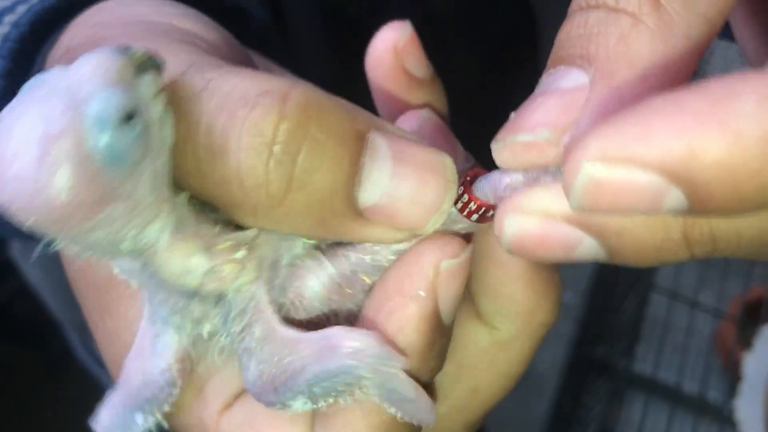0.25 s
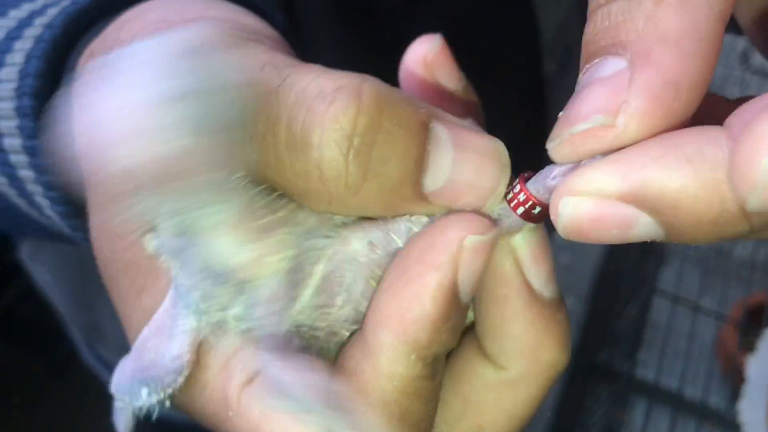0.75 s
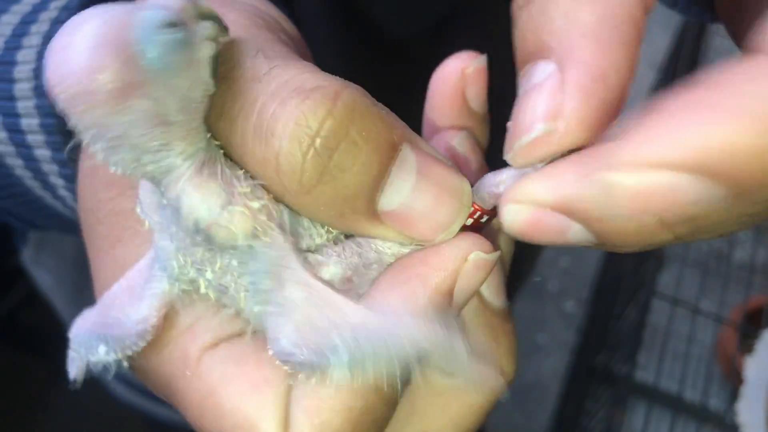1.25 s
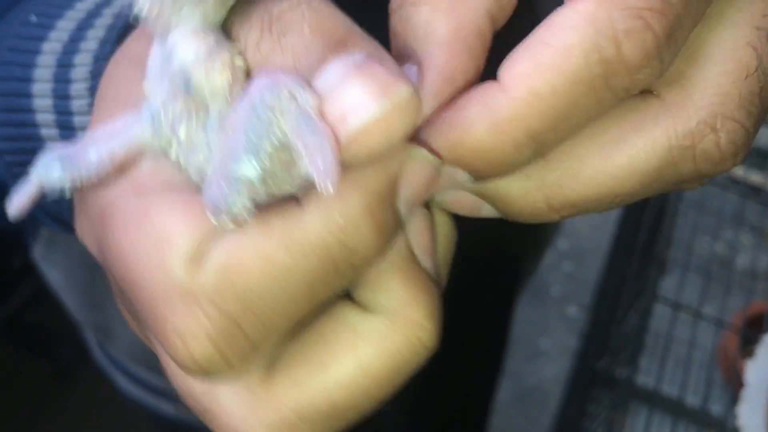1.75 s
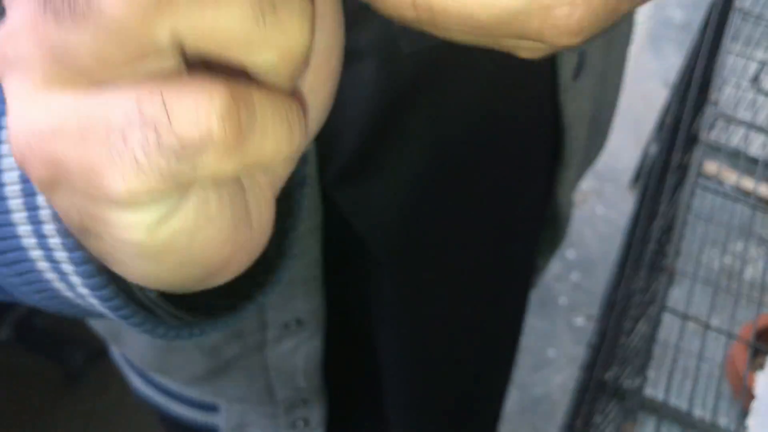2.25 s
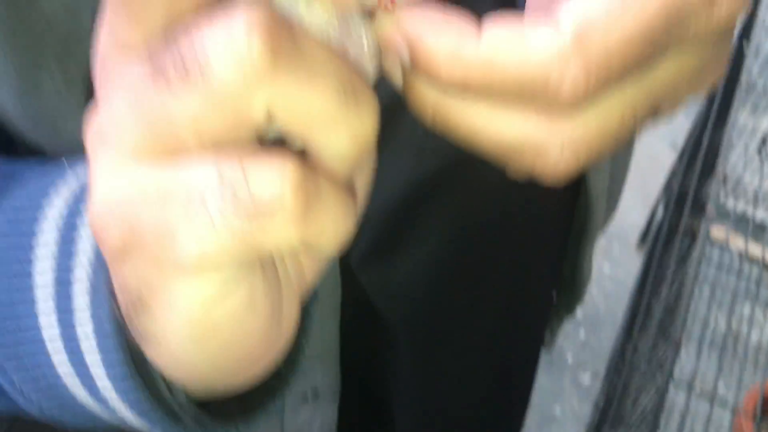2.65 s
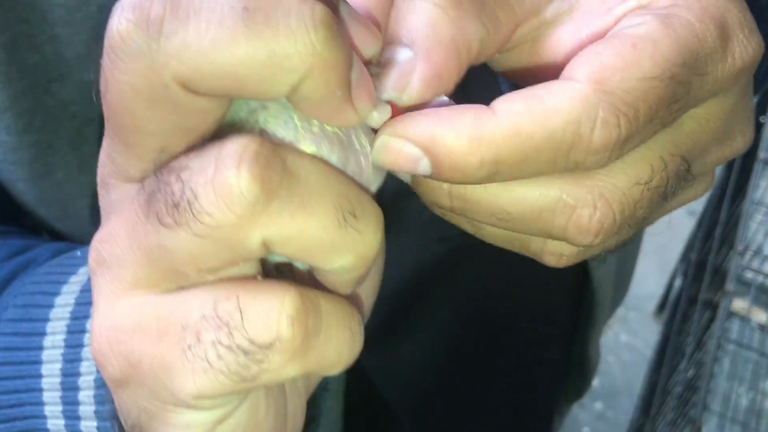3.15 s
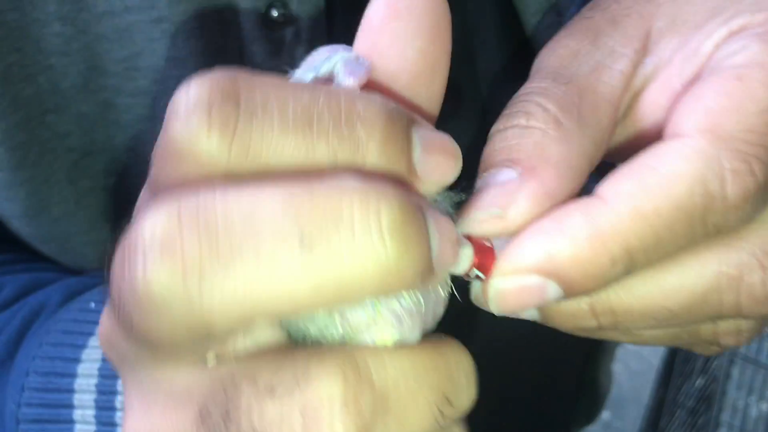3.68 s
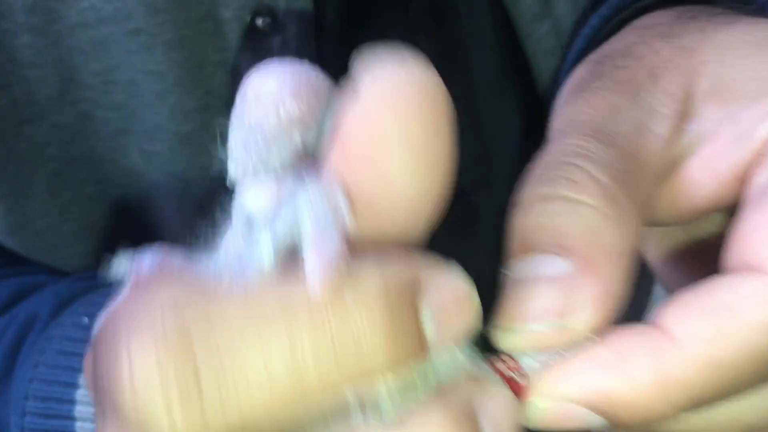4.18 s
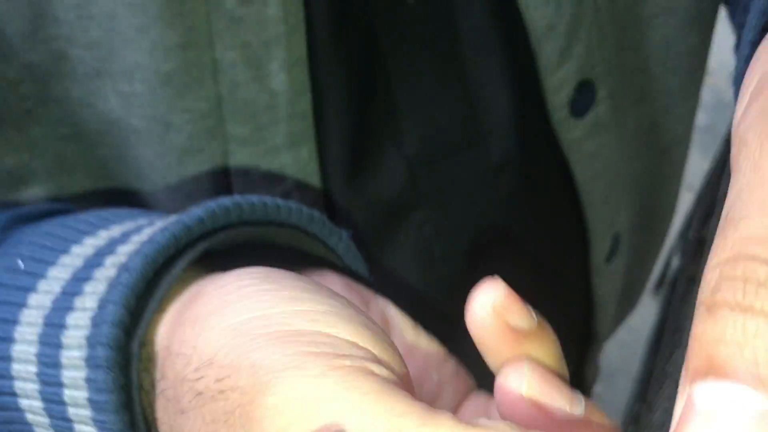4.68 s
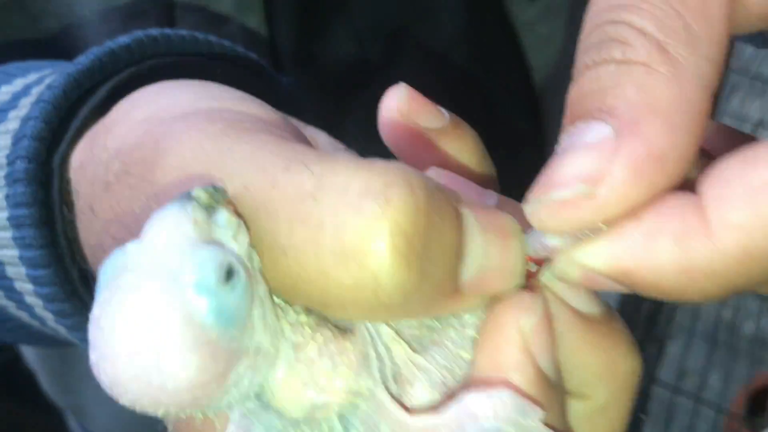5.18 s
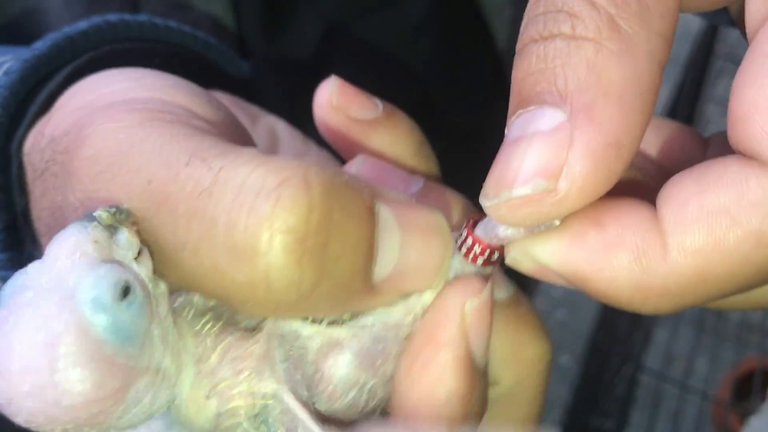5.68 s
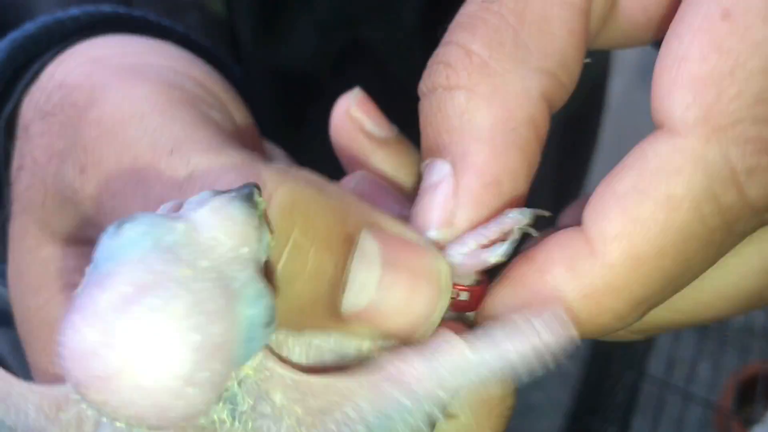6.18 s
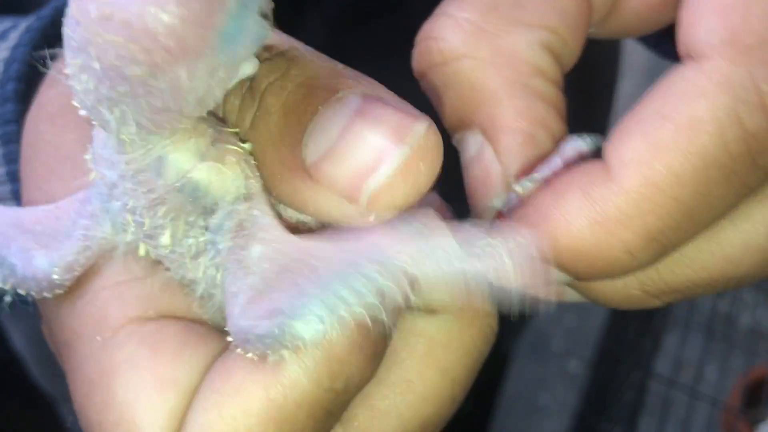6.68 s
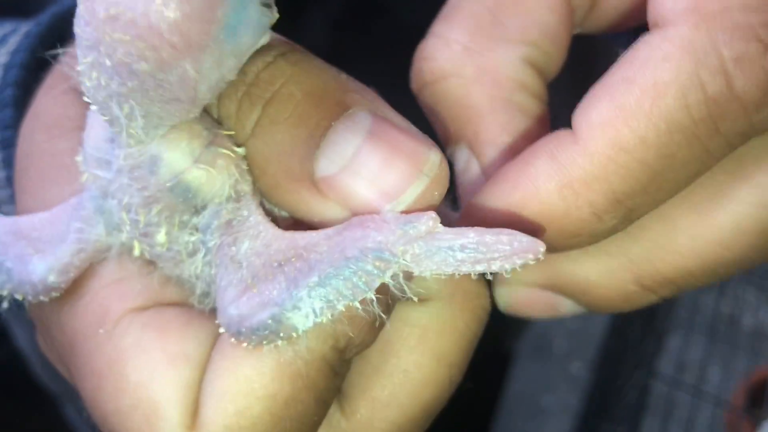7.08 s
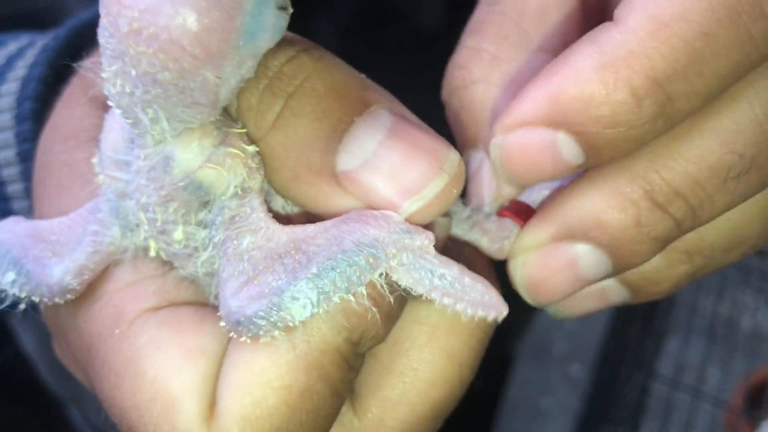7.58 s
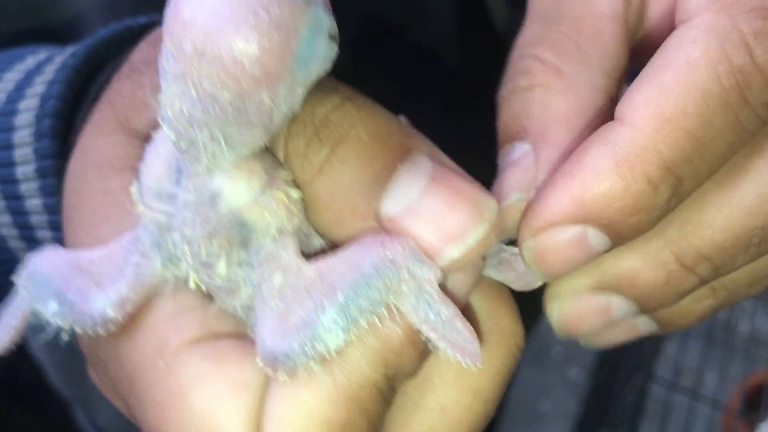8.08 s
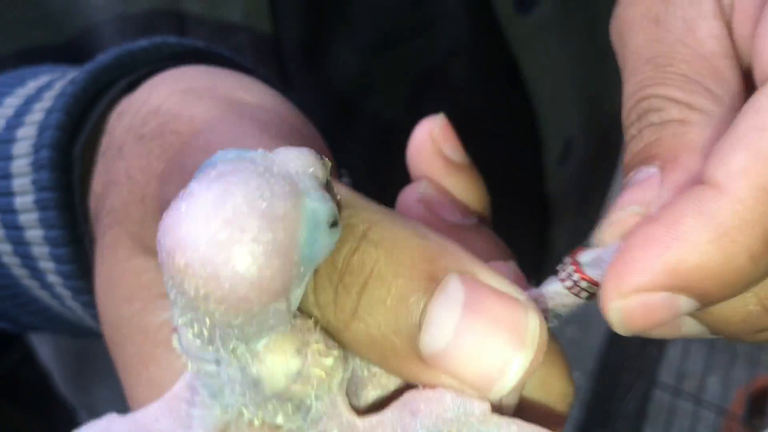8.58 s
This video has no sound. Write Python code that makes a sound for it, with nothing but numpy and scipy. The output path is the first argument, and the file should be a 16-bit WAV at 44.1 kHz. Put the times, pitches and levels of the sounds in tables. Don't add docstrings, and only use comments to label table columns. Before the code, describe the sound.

In an echoing aviary, a parrot chick rasps softly and screams once while adult parrots shriek falling two-note calls over flock peeps and ticks.

```python
import sys
import numpy as np
from scipy import signal
from scipy.fft import rfft, irfft
from scipy.io import wavfile
from scipy.ndimage import uniform_filter1d, map_coordinates

SR = 44100
rng = np.random.default_rng(int(sys.argv[2]) if len(sys.argv) > 2 else 0)


def boost_factor(decibels):
    exponent = np.asarray(decibels, float) / 20
    return 10 ** exponent


def waveform_to_disk(signal):
    frames = np.transpose(np.atleast_2d(signal))
    scaled = np.clip(frames, -1, 1) * 32767
    samples = np.round(scaled).astype(np.int16)
    wavfile.write(sys.argv[1], SR, samples)


N = 389844
PATHS = 8
PURE_TILT_DB = -22.5

# f/Hz, level/dB
ADULT_THROAT = [(1200, -16), (2100, -10.5), (2800, -17.5), (3600, 2.5), (4500, 2.5), (5500, -5),
                (7000, -11), (9000, -2.5), (11000, -10.5), (15000, -20)]
# f/Hz, level/dB
FLOCK_THROAT = [(900, 1), (2200, 0), (4300, 8.5), (5800, -1), (7500, -6), (10000, -14), (14000, -46)]


def unit(x):
    return x / np.sqrt(np.mean(x ** 2) + 1e-20)


def along(points, hz):
    f, v = np.transpose(points)
    return np.interp(np.log(hz + 1), np.log(f + 1), v)


def curve(rows):
    s, value = np.transpose(rows)
    return np.interp(np.arange(N) / SR, s, value)


def wobble(rate, n=N):
    knots = rng.standard_normal(int(N * rate / SR) + 4 if n == N else 400)
    return map_coordinates(knots, [np.arange(n) * rate / SR], mode="wrap")


def coloured(x, spectrum):
    gain = boost_factor(along(spectrum, np.fft.rfftfreq(len(x), 1 / SR)))
    return unit(irfft(rfft(x) * gain, len(x)))


def add(bus, s, x):
    part = bus[round(s * SR):][:len(x)]
    part += x[:len(part)]


def sagging(rows, sag, tilt_db):
    return [(s, length, hz, hz * sag, db, tilt_db) for s, length, hz, db in rows]


def sliding(rows, tilt_db):
    return [(*row, tilt_db) for row in rows]


def hall(feeds):
    # f/Hz, t60/s
    decay = [(500, 0.17), (1500, 1.26), (3500, 1.16), (7000, 0.75), (14000, 0.34)]
    hz, t, z = signal.stft(rng.standard_normal((PATHS, 3 * SR // 2)), SR, nperseg=256)
    t60 = np.clip(along(decay, hz), .1, 3)[:, None]
    tails = signal.istft(z * boost_factor(-60 * t / t60), SR, nperseg=256)[1]
    t = np.arange(tails.shape[1]) / SR
    tails *= np.clip(t / 0.01 - .3, 0, 1)
    tails *= 1 + 1.9 * np.exp(-t / 0.0074)
    return signal.fftconvolve(feeds, tails / np.linalg.norm(tails[0]), axes=1)[:, :N].sum(0)


def sing(notes, throat, bend, attack, jitter, buzz, rasp_db, breath_db, wet_db, dry_db, first=0):
    # f/Hz, level/dB
    beak_air = [(500, -69), (1200, -25.5), (2200, 4.5), (3500, 6.5), (5200, -5.5), (8500, -4.5),
                (11000, -16.5), (15500, -26)]
    buzz_hz = 334.3
    catch_hz, catch_share = 170, 1.1
    direct, feeds = np.zeros(N), np.zeros((PATHS, N))
    k = np.arange(1, 15)[:, None]
    for i, (s, length, hz_from, hz_to, db, tilt_db) in enumerate(notes):
        u = np.linspace(0, 1, max(round(length * SR), 64))
        n = len(u)
        shake = jitter * wobble(396, n) + buzz * u * np.sin(2 * np.pi * buzz_hz * length * u)
        pitch = (hz_from + (hz_to - hz_from) * u ** bend) * (1 + shake)
        hz = k * pitch
        levels = boost_factor(along(throat, hz) + tilt_db * np.log2(k)) * (hz < SR / 2.2)
        partials = levels * np.sin(2 * np.pi * k * np.cumsum(pitch) / SR + k * k)
        partials /= np.std(partials.sum(0))
        aside = boost_factor(-3.5 * np.log2(np.maximum(hz / 4500, 1)))
        swell = np.clip(np.minimum((u / attack) ** 1.5, (1 - u) / .15), 0, 1)
        air = coloured(rng.standard_normal(SR // 4), beak_air)[:n]
        breath = swell * boost_factor(breath_db) * air
        catches = catch_share * np.clip(wobble(catch_hz, n), 0, 2)
        unsteady = boost_factor(min(rasp_db, 4) * (wobble(700, n) - catches))
        near = unsteady * (aside * partials).sum(0) + breath
        around = unsteady * partials.sum(0) + breath
        add(direct, s, boost_factor(db + dry_db) * swell * near)
        add(feeds[(i + first) % PATHS], s, boost_factor(db + wet_db) * swell * around)
    return direct, feeds


def chatter():
    # f/Hz, level/dB
    far_throat = [(700, -0.5), (1000, -4), (1600, 0), (2500, 0), (3500, -20), (5000, -9.5), (9000, -22)]
    notes = []
    for when, size, height, loud in rng.random((240, 4)):
        hz = 1000 + 1300 * height
        notes.append((when * N / SR, .03 + .05 * size, hz, hz * (.65 + .2 * size), 4 * loud, -2))
    near, feeds = sing(notes, far_throat, bend=1, attack=.3, jitter=.03, buzz=.05, rasp_db=4,
                       breath_db=-8, wet_db=0, dry_db=-8)
    babble = near + hall(feeds)
    return babble / np.sqrt(np.abs(uniform_filter1d(babble ** 2, size=SR // 5)) + 1e-9)


def background():
    # t/s, level/dB
    chatter_course = [(0, -51), (.45, -48), (.9, -44), (1.3, -49.5), (1.7, -41), (2.1, -44.5), (2.45, -37),
                      (3, -52), (3.3, -38.5), (4.8, -38.5), (5.3, -42.5), (5.85, -36.5), (6.5, -45.5),
                      (7.05, -52.5), (7.55, -47.5), (8, -51), (8.4, -40), (8.84, -53)]
    hum_course = [(0, -51.5), (1.5, -49.5), (3, -52), (4.5, -52.5), (6, -51.5), (7.5, -49), (8.84, -51.5)]
    air_course = [(0, -61), (1.4, -62), (2.2, -63), (3, -60.5), (6.5, -65), (7.3, -59), (8.84, -69)]
    # f/Hz, level/dB per Hz
    air_colour = [(2350, -34), (4000, 13.5), (4770, 9), (5430, -12), (5910, 3), (13500, 6.5), (15500, -9)]
    rumble_colour = [(15, -38), (25, -29), (46, 10), (75, 4), (141, 6), (212, 7.5), (517, -2), (608, 0.5),
                     (800, 0.5), (926, 3), (1200, 2.5), (1560, -7), (2640, -120)]
    # f/Hz, level/dB
    fan = [(52, -86), (64, -57), (100, -63), (192, -71)]
    t = np.arange(N) / SR
    lines = np.zeros(N)
    for hz, db in fan:
        lines += boost_factor(db + 3.9 * wobble(12.0)) * np.sin(2 * np.pi * (hz * t + 0.43 * wobble(7.4)))
    air_db = curve(air_course) + 4.4 * wobble(4.4) + wobble(25)
    air = boost_factor(air_db) * coloured(rng.standard_normal(N), air_colour)
    hum_db = curve(hum_course) + 1.37 * wobble(6.7)
    hum = boost_factor(hum_db) * coloured(rng.standard_normal(N), rumble_colour)
    return boost_factor(curve(chatter_course) - 1.83) * chatter() + air + hum + lines


def earlier_calls():
    # f/Hz, level/dB
    past_calls = [(3990, -35), (3500, -40), (2900, -48), (1800, -41.5)]
    length_s, sag, ago_s = .012, .75, .06
    notes = sagging([(0, length_s, hz, db) for hz, db in past_calls], sag, PURE_TILT_DB)
    feeds = sing(notes, ADULT_THROAT, bend=1, attack=.1, jitter=.06, buzz=0, rasp_db=4,
                 breath_db=4, wet_db=3, dry_db=0)[1]
    return hall(feeds[:, :SR // 10])[round(ago_s * SR):]


def flock():
    # t/s, length/s, f/Hz, level/dB
    shrills = [(1.67, 0.039, 2130, -52), (1.95, 0.03, 3160, -42), (2.08, 0.053, 2940, -43),
               (2.137, 0.025, 2740, -47), (2.32, 0.028, 2800, -47), (2.52, 0.062, 1990, -45.5),
               (7.645, 0.028, 3200, -58)]
    peeps = [(.92, 0.08, 1583, -53), (.93, 0.11, 3170, -52), (.92, 0.081, 4740, -57),
             (1.03, .04, 2900, -50), (1.05, .02, 1607, -45), (1.1, 0.028, 1582, -48),
             (1.35, 0.05, 2970, -56), (1.14, 0.01, 900, -44.5), (1.45, 0.031, 2260, -47),
             (1.925, 0.01, 3600, -40), (2.11, 0.027, 2440, -45.5), (2.32, 0.034, 2765, -39),
             (2.37, 0.035, 2410, -41.5), (6.18, 0.1, 1089, -44.5), (6.628, 0.063, 1123, -39.5),
             (6.63, 0.04, 1448, -37), (6.7, .12, 1476, -46), (6.632, 0.014, 2164, -32),
             (7.575, 0.023, 1540, -48), (7.68, 0.061, 3650, -50.5), (7.88, 0.045, 1470, -51),
             (8.575, 0.061, 3420, -42)]
    squawks = [(1.29, 0.04, 1640, -58), (1.32, 0.041, 1450, -51.5), (2.4, 0.033, 1270, -46),
               (7.1, 0.12, 3580, -56.5), (7.94, 0.053, 1067, -45.5), (8.065, 0.069, 1097, -44),
               (8.198, 0.067, 1110, -43.5), (8.3, 0.13, 1114, -52)]
    # t/s, length/s, first f/Hz, last f/Hz, level/dB
    swoops = [(.655, 0.03, 2365, 2760, -39), (1.765, 0.017, 3310, 2130, -46),
              (1.782, 0.097, 2150, 1780, -46.5), (1.97, .1, 2600, 2500, -52),
              (1.945, 0.025, 3030, 2550, -41), (2.07, .055, 2850, 3000, -52),
              (2.125, 0.04, 3000, 3430, -48), (2.348, 0.031, 3375, 2530, -36.5),
              (2.54, 0.0213, 3830, 3000, -43.5), (2.6, 0.031, 2550, 3500, -45),
              (7.305, 0.037, 1865, 1594, -43.5), (8.27, 0.058, 946, 1486, -48.5)]
    sag, squawk_tilt_db, shrill_tilt_db = .975, -2, 9
    cries = sagging(shrills, sag, shrill_tilt_db) + sagging(peeps, sag, PURE_TILT_DB)
    cries = sorted(cries + sliding(swoops, PURE_TILT_DB))
    return [sing(cries, FLOCK_THROAT, bend=.8, attack=.12, jitter=.01, buzz=.012, rasp_db=3,
                 breath_db=-18, wet_db=-4, dry_db=0),
            sing(sagging(squawks, sag, squawk_tilt_db), FLOCK_THROAT, bend=.8, attack=.25, jitter=.015,
                 buzz=.015, rasp_db=4, breath_db=-9, wet_db=-2, dry_db=-1)]


def crier():
    # t/s, length/s, first f/Hz, last f/Hz, level/dB, tilt/dB per octave
    cries = [
        (.365, 0.083, 1715, 1553, -47, -9.5),
        (.582, 0.087, 1551, 1404, -46.5, -6.5),
        (8.632, 0.13, 1884, 1254, -37.5, -7),
    ]
    # f/Hz, level/dB
    cry_throat = [(900, -8), (1700, -4), (2400, -7), (3400, 7), (4600, 4), (5800, 1), (7500, -19),
                  (14000, -50)]
    return [sing(cries, cry_throat, bend=1, attack=.12, jitter=.008, buzz=.04, rasp_db=4,
                 breath_db=-11, wet_db=1, dry_db=0, first=4)]


def answering_adult():
    # t/s, length/s, f/Hz, level/dB
    answers = [(3.45, 0.21, 3156, -31.5), (3.7, 0.095, 3113, -29), (4.0, 0.057, 3130, -29.5),
               (4.21, .11, 3183, -32), (4.53, 0.11, 3145, -35.5), (4.76, 0.082, 3253, -31),
               (5.04, 0.162, 3214, -32), (5.37, 0.068, 3264, -30.5), (5.635, 0.076, 3257, -29),
               (5.94, 0.075, 3234, -29.5)]
    whistles = [(3.26, 0.085, 2864, -30.5), (5.5, 0.078, 3364, -32.5), (5.76, 0.086, 3383, -33.5),
                (6.07, 0.098, 3200, -30)]
    # t/s, length/s, first f/Hz, last f/Hz, level/dB
    slurs = [
        (3.222, 0.079, 3120, 2907, -34.5),
        (4.495, 0.023, 2900, 3210, -20),
        (4.512, 0.038, 3167, 3176, -25.5),
        (5.618, 0.024, 3573, 3270, -30.5),
    ]
    # f/Hz, level/dB
    second_throat = [(2600, -36.5), (3200, 8.5), (6300, -3), (9700, -11.5), (13000, -16.5), (16000, -43)]
    rise, tilt_db, slur_tilt_db, whistle_sag = 1.012, 3.5, 3, .94
    notes = sagging(answers, rise, tilt_db) + sliding(slurs, slur_tilt_db)
    notes = sorted(notes + sagging(whistles, whistle_sag, PURE_TILT_DB))
    return [sing(notes, second_throat, bend=1.1, attack=.14, jitter=.011, buzz=.02, rasp_db=4,
                 breath_db=-7, wet_db=0, dry_db=-5, first=5)]


def ticks():
    # t/s, peak level/dB, knock level/dB, t60/s
    contacts = [(0.7144, -26, 6, 0.015), (0.99, -27.5, 1, 0.17), (1.898, -29, -15, 0.027),
                (1.927, -15, 7.5, 0.042), (7.051, -20, -1, 0.033), (7.883, -34, -8, 0.097),
                (7.9708, -31, -3, 0.048)]
    out, t = np.zeros(N), np.arange(SR // 8) / SR
    for s, db, low_db, t60 in contacts:
        spit = coloured(rng.standard_normal(len(t)), [(2500, -26), (4500, 6), (12000, 1), (16000, -1.5)])
        knock = coloured(rng.standard_normal(len(t)), [(300, -26), (900, 6), (3600, -1.5), (5000, -16.5)])
        add(out, s, boost_factor(db - 20 - 60 * t / max(t60, .004)) * (spit + boost_factor(low_db) * knock))
    return out


def scrape():
    # t/s, level/dB, slip rate/Hz
    drag = [
        (2.243, -30, 760),
        (2.25, -25, 750),
        (2.27, -23.5, 600),
        (2.279, -28.5, 460),
        (2.289, -57, 290),
    ]
    # f/Hz, level/dB per Hz
    early_colour = [(150, -62), (250, -34), (566, -42), (955, -10), (1640, -14), (3840, -21.5), (4260, -21),
                    (7060, -15.5), (14900, -26), (16000, -30)]
    late_colour = [(120, -48), (200, -17), (851, -4), (1420, -6.5), (2420, -3.5), (3310, -34), (5630, -14),
                   (8740, -26), (11700, -8), (16000, -37)]
    s, db, rate = np.transpose(drag)
    t = np.arange(s[0], s[-1], 1 / SR)
    slip_hz = np.interp(t, s, rate) * (1 + 0.36 * wobble(500, len(t)))
    slips = np.diff(np.floor(np.cumsum(slip_hz) / SR), prepend=0)
    rub = unit(slips * boost_factor(rng.standard_normal(len(t)))) + 1.2 * rng.standard_normal(len(t))
    late = np.clip((t - s[0] - .012) / 0.022, 0, 1)
    colour = (1 - late) * coloured(rub, early_colour) + late * coloured(rub, late_colour)
    out = np.zeros(N)
    add(out, s[0], boost_factor(np.interp(t, s, db)) * colour)
    return out


def rustle():
    # t/s, length/s, centre f/Hz, level/dB
    puffs = [(2.335, 0.086, 8900, -47), (2.89, .06, 13000, -74), (2.973, 0.054, 13000, -59),
             (4.475, 0.039, 11900, -45), (6.62, .1, 12500, -56), (6.755, .07, 13500, -60),
             (6.87, .05, 11900, -65), (7.004, 0.031, 12500, -55), (7.053, 0.065, 12000, -60),
             (7.2, 0.054, 13500, -64), (7.3, .05, 11000, -63), (7.41, .03, 12000, -65),
             (7.5, .04, 11000, -66), (7.57, .04, 12500, -64), (7.735, .08, 13000, -65)]
    out = np.zeros(N)
    for s, length, hz, db in puffs:
        u = np.linspace(0, 1, max(round(length * SR), 64))
        skin = [(hz / 2, -40), (hz * 0.89, -5), (hz, 0), (hz * 1.0, -8), (hz * 2, -50)]
        hiss = coloured(rng.standard_normal(SR // 4), skin)[:len(u)]
        grain = boost_factor(db + 3 * wobble(300, len(u)))
        add(out, s, grain * np.minimum(10 * u, 1) * (1 - u) * hiss)
    return out


def adult():
    # t/s, held length/s, held f/Hz, held level/dB, fall level/dB
    shrieks = [(3.026, 0.076, 3820, -24.5, -24.5), (3.275, 0.13, 3750, -21.5, -20.5),
               (3.601, 0.061, 3752, -20.5, -21.5), (3.885, 0.065, 3707, -21, -22),
               (4.665, 0.064, 3660, -18.5, -22), (4.925, 0.063, 3610, -21, -22),
               (5.19, 0.046, 3637, -21.5, -22)]
    # t/s, length/s, first f/Hz
    fall_notes = [(3.086, 0.094, 2518), (3.415, 0.072, 2380), (3.665, 0.074, 2397), (3.955, 0.073, 2378),
                  (4.733, 0.083, 2323), (4.993, 0.071, 2343), (5.249, 0.072, 2350)]
    # t/s, first f/Hz, level/dB
    lone_falls = [(4.551, 2420, -29), (5.439, 2290, -31), (5.701, 2353, -32.5), (6.001, 2343, -29.5)]
    held_sag, held_softer_db, held_tilt_db = .985, 5.5, -2
    break_s, break_sag, break_tilt_db = .032, .8, -9
    fall_s, fall_sag, fall_tilt_db = .075, .7, -3
    held, breaks = [], []
    for s, length, hz, db, _ in shrieks:
        steady_s, end_hz = length - break_s, hz * held_sag
        held.append((s, steady_s, hz, end_hz, db - held_softer_db, held_tilt_db))
        breaks.append((s + length - break_s, break_s, end_hz, hz * break_sag, db, break_tilt_db))
    falls = [(*fall, call[-1]) for fall, call in zip(fall_notes, shrieks)]
    falls = sagging(falls, fall_sag, fall_tilt_db)
    lone = sagging([(s, fall_s, hz, db) for s, hz, db in lone_falls], fall_sag, fall_tilt_db)
    return [sing(held, ADULT_THROAT, bend=1, attack=.6, jitter=.003, buzz=.006, rasp_db=2,
                 breath_db=-20, wet_db=2, dry_db=0),
            sing(breaks, ADULT_THROAT, bend=1.3, attack=.15, jitter=.009, buzz=.025, rasp_db=4,
                 breath_db=-12, wet_db=1, dry_db=0, first=1),
            sing(falls, ADULT_THROAT, bend=1, attack=.12, jitter=.011, buzz=.025, rasp_db=4,
                 breath_db=-6, wet_db=-3, dry_db=-3.5, first=3),
            sing(lone, ADULT_THROAT, bend=1, attack=.08, jitter=.011, buzz=.025, rasp_db=4,
                 breath_db=-9, wet_db=-2, dry_db=-4, first=2)]


def chick():
    # t/s, length/s, f/Hz, level/dB
    rasp_notes = [
        (0.12, 0.11, 1498, -44.5),
        (0.668, 0.034, 1405, -47),
        (1.555, 0.054, 1052, -48.5),
        (1.947, 0.017, 1353, -40.5),
        (6.634, 0.0197, 1800, -40),
        (8.268, 0.11, 1500, -50.5),
        (8.505, 0.036, 1194, -48),
    ]
    # t/s, length/s, first f/Hz, last f/Hz, level/dB
    screech = [
        (4.147, 0.02, 1685, 2450, -26.5),
        (4.166, 0.014, 1800, 2120, -28),
        (4.17, 0.034, 2070, 2170, -26.5),
        (4.198, 0.042, 2444, 2410, -31),
        (4.232, 0.017, 2443, 1870, -29),
    ]
    # t/s, f/Hz, level/dB, tilt/dB per octave
    trill = [(1.503, 1070, -45, 1), (1.524, 1035, -36, 0), (1.545, 1020, -47, 1), (1.568, 1050, -45, -2),
             (6.532, 1720, -41, 4), (6.547, 3060, -33, -1), (6.555, 3060, -39, -20), (6.564, 3150, -32, 1),
             (6.573, 3000, -32, -20), (6.58, 3330, -30, 0), (6.589, 2980, -39, -20), (6.597, 1830, -26, 3),
             (6.603, 3050, -50, -20), (8.455, 1190, -42, 22), (8.469, 1250, -27.5, -1),
             (8.476, 1208, -28.5, 0), (8.489, 1145, -32, 1), (8.5, 1160, -33, 1)]
    # t/s, length/s, first f/Hz, last f/Hz, level/dB, tilt/dB per octave
    yelp = [
        (6.611, .022, 2025, 1704, -28.5, 5.5),
    ]
    # f/Hz, level/dB
    young_throat = [(1000, 6), (2200, 1), (4300, 3), (6400, -0.5), (8500, -7.5), (11000, -16.5),
                    (15000, -25)]
    rasp_sag, bright_per_db, even_db, tilt_low_db, tilt_top_db = .91, 1.5, -45, -5, 6
    screech_tilt_db, dulls_db_per_s, burst_s = 10, 40, .0058
    rasps = []
    for s, length, hz, db in rasp_notes:
        tilt_db = np.clip(bright_per_db * (db - even_db), tilt_low_db, tilt_top_db)
        rasps.append((s, length, hz, hz * rasp_sag, db, tilt_db))
    start_s = screech[0][0]
    scream = [(*row, screech_tilt_db - dulls_db_per_s * (row[0] - start_s)) for row in screech]
    bursts = [(s, burst_s, hz, hz, db, tilt_db) for s, hz, db, tilt_db in trill]
    return [sing(rasps, young_throat, bend=.8, attack=.3, jitter=.028, buzz=.03, rasp_db=4,
                 breath_db=-1, wet_db=-1, dry_db=2),
            sing(scream, young_throat, bend=.75, attack=.15, jitter=.025, buzz=.025, rasp_db=4,
                 breath_db=-1, wet_db=0, dry_db=2, first=6),
            sing(bursts, young_throat, bend=1, attack=0.23, jitter=.005, buzz=.004, rasp_db=1.6,
                 breath_db=-5, wet_db=-2, dry_db=-1.5),
            sing(yelp, young_throat, bend=.9, attack=.08, jitter=.006, buzz=.01, rasp_db=1.5,
                 breath_db=-10, wet_db=-1, dry_db=0, first=3)]


def scene():
    voices = flock() + crier() + answering_adult() + adult() + chick()
    feeds = sum(feed for direct, feed in voices)
    claws, ring = ticks(), scrape()
    add(feeds[0], 0, boost_factor(-0.5) * claws + boost_factor(-15.5) * ring)
    birds = sum(direct for direct, feed in voices)
    mix = birds + claws + ring + rustle() + hall(feeds) + background()
    add(mix, 0, earlier_calls())
    return mix[None]


def band_limit(x):
    return signal.sosfilt(signal.butter(12, 16460, fs=SR, output="sos"), x)


def record(dry):
    top_hz, bass_hz = 15800, 36
    hz = np.fft.rfftfreq(N, 1 / SR)
    band = (hz < top_hz) / (1 + (bass_hz / (hz + 1)) ** 4)
    return band_limit(irfft(rfft(dry) * band, N))


dry = scene()
out = record(dry)
waveform_to_disk(out)
```